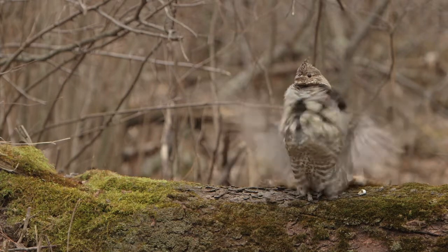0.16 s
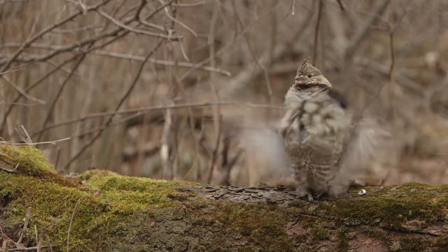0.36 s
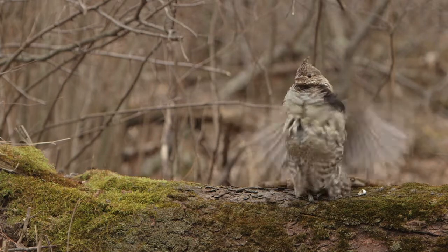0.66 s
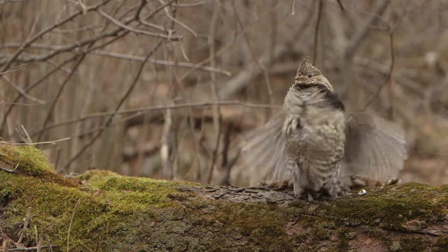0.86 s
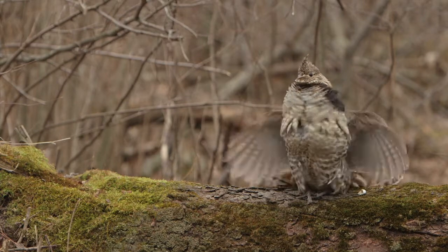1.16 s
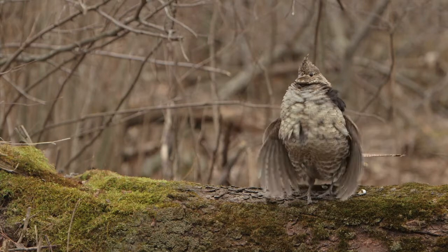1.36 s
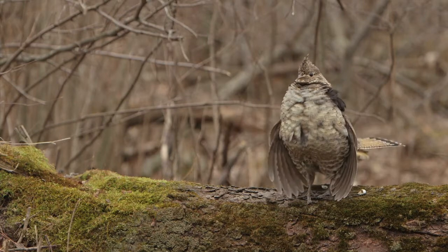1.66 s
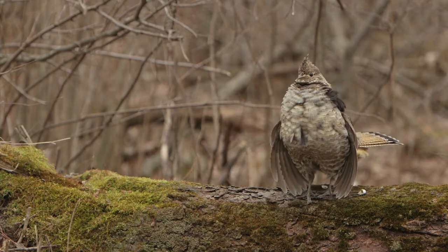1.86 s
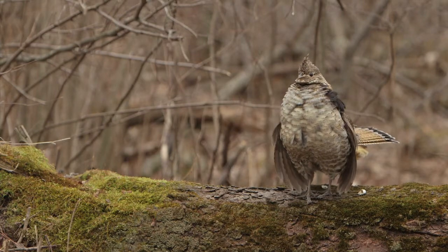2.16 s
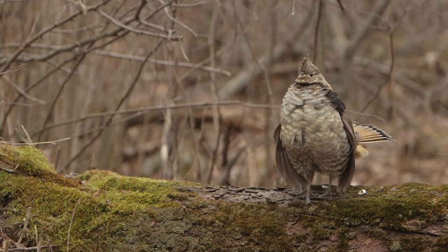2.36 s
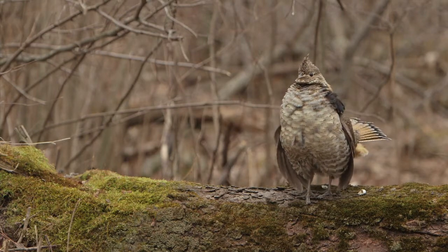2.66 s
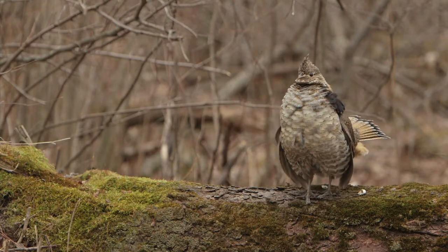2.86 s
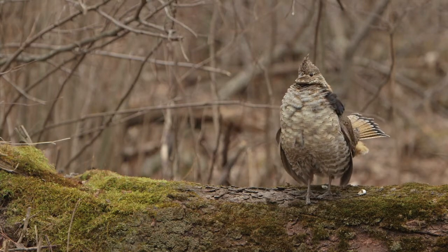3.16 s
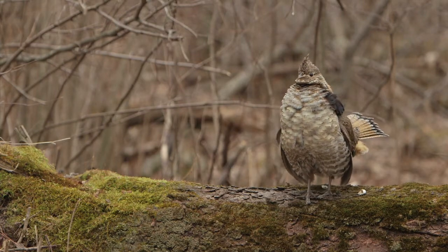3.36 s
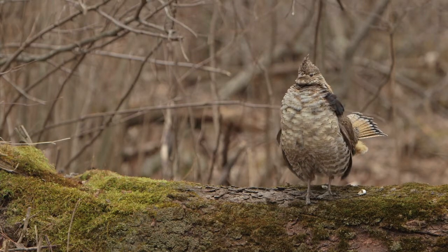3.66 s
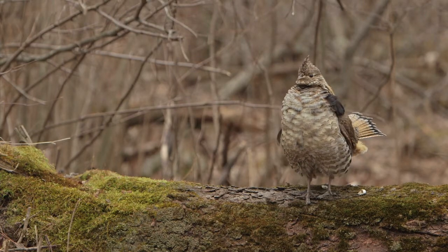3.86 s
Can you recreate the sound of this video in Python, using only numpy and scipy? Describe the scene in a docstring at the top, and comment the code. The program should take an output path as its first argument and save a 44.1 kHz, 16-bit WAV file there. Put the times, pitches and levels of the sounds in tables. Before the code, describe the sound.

A grouse drums with its wings, close and very deep: about fifteen blunt, slightly clipped thumps with airy swishes, from roughly sixteen a second slowing to eight, ending near 1.2 s. Faint songbirds whistle among them. Low rumble and hiss remain, fading by 3 s; small buzzes come around 1.9-2.4 s, a rapid twitter at 2.5-2.9 s, then sparse chips and whistles over soft woodland hush until 4 s.

```python
"""In a woodland, a grouse drums on a log in front of a stereo microphone: its strokes slow and stop.
Each stroke is a deep pressure pulse with a swish of shaped noise; the loudest thumps clip at full scale.
Small songbirds whistle, buzz and chip as gliding tones, with scattered tree echoes around them.
Behind lie a low rumble that cuts off, a hiss, a soft hush and a far chorus, all coloured noise.
"""
import sys
import numpy as np
from scipy import signal
from scipy.fft import rfft, irfft
from scipy.io import wavfile
from scipy.ndimage import uniform_filter1d

SR = 44100
rng = np.random.default_rng(int(sys.argv[2]) if len(sys.argv) > 2 else 0)


def output_pcm(signal):
    """Save a mono or channel-first signal as 16-bit PCM at the path in sys.argv[1].

    Samples are clipped to [-1, 1] before scaling.
    """
    pcm = np.clip(np.atleast_2d(signal).T, -1, 1) * 32767
    wavfile.write(sys.argv[1], SR, np.round(pcm).astype(np.int16))


N = 176400  # samples, 4 s


def amp(db):
    """Decibels to gain."""
    return 10 ** (np.asarray(db) / 20)


def unit(x):
    """Scales to rms 1."""
    return x / np.sqrt(np.mean(x ** 2) + 1e-20)


def read(points, hz):
    """Reads a spectrum table on a log-frequency axis."""
    f, value = np.transpose(points)
    return np.interp(np.log(hz + 1), np.log(f), value)


def add(mix, start_s, sound):
    """Mixes a sound in at a time, trimmed to the ends of the scene."""
    at = round(start_s * SR)
    sound = sound[max(-at, 0):]
    part = mix[max(at, 0):][:len(sound)]
    part += sound[:len(part)]


def progress(length_s):
    """Runs from 0 to 1 over a call."""
    return np.linspace(0, 1, int(length_s * SR), endpoint=False)


def wander(like, size):
    """Smooth random drift, as long as a call; size is the smoothing in samples."""
    return unit(uniform_filter1d(rng.standard_normal(SR), size=size))[:len(like)]


def band(x, centre_hz, octaves):
    """A broad resonance, bell-shaped on an octave axis, at rms 1."""
    hz = np.fft.rfftfreq(len(x), 1 / SR)
    distance = np.log2((hz + 1) / centre_hz) / octaves
    return unit(irfft(rfft(x) * np.exp(-.5 * distance ** 2), len(x)))


def trees(x, t60_s, spread):
    """Scattered echoes from trunks, dying by 60 dB in t60_s and partly different on each side."""
    t = np.arange(SR) / SR
    sparse = rng.standard_normal((3, SR)) * (rng.random((3, SR)) < .05)
    taps = sparse * amp(-60 * t / t60_s) * np.minimum(t / 0.012, 1)
    tail = taps[0] + spread * taps[1:]
    return signal.fftconvolve(x[None], tail / np.linalg.norm(tail[0]), axes=1)[:, :N]


# How alike left and right are at the microphone: (frequency [Hz], likeness [0-1])
SIDE_LIKENESS = [(100, 1), (1200, 0.96), (2500, 0.98), (5000, 0.67), (15000, .75)]


def noise(spectrum, patchy_db):
    """Stereo noise of a given colour at rms 1, with patches drifting in time and frequency."""
    frames, hz = N // 512 + 5, np.fft.rfftfreq(2048, 1 / SR)
    a, b, c, d, patches = rng.standard_normal((frames, len(hz), 5)).T
    patches = unit(uniform_filter1d(uniform_filter1d(patches, 20, 0), 5, 1))
    same = np.clip(read(SIDE_LIKENESS, hz), 0, 1)[:, None]
    left = a + 1j * b
    right = same * left + np.sqrt(1 - same ** 2) * (c + 1j * d)
    colour = amp(read(spectrum, hz)[:, None] + patchy_db * patches)
    return unit(signal.istft(np.array([left, right]) * colour, nperseg=2048, noverlap=1536)[1][:, :N])


# Background colours: (frequency [Hz], relative density [dB per Hz]); the chorus is many far birds blurred
RUMBLE_COLOUR = [(20, -26), (45, -12.5), (70, 1.5), (100, -1.5), (135, -4.5), (180, -38), (300, -50.5)]
HISS_COLOUR = [(100, -7), (200, 2), (420, 2.5), (800, -1.5), (1350, -2), (1700, -7), (3500, -10),
               (6000, -16), (9000, -19.5), (15500, -24.5)]
HUSH_COLOUR = [(75, -62), (110, -25), (170, -9), (245, 2.5), (330, -6), (550, -9), (1200, -23), (1900, -37),
               (4000, -58), (7500, -29), (15500, -48.5)]
CHORUS_COLOUR = [(1500, -25), (2600, -19.5), (3500, 2), (5000, 5.5), (7500, -6.5), (10000, -38)]
# Background levels through the scene: (time [s], level [dB])
RUMBLE_COURSE = [(0, -32.5), (1.15, -38.5), (1.33, -32), (1.5, -38.5), (2.2, -39.5), (3.05, -46.5),
                 (3.075, -85)]
HISS_COURSE = [(0, -42), (.45, -42), (1.8, -44), (2.4, -45.5), (2.8, -49.5), (3.1, -52.5)]
HUSH_COURSE = [(0, -47.5), (1.6, -66.5), (2.3, -52.5), (2.9, -42.5), (3.3, -42.5), (4, -42.5)]
CHORUS_COURSE = [(0, -51.5), (1.6, -71), (2.3, -57.5), (2.5, -47.5), (2.8, -48), (3, -54.5), (4, -47.5)]


def woodland():
    """Low rumble and hiss give way to a softer hush and a far chorus, each noise following its level."""
    def level(points):
        return amp(np.interp(np.arange(N) / SR, *np.transpose(points)))
    rumble = level(RUMBLE_COURSE) * noise(RUMBLE_COLOUR, patchy_db=-1.0)
    hiss = level(HISS_COURSE) * noise(HISS_COLOUR, patchy_db=1.34)
    hush = level(HUSH_COURSE) * noise(HUSH_COLOUR, patchy_db=1.0)
    chorus = level(CHORUS_COURSE) * noise(CHORUS_COLOUR, patchy_db=7.5)
    return rumble + hiss + hush + chorus


OVERTONE_DB, WAVER = -27.5, 0.007  # second harmonic; rms share of the pitch
NEAR_DB, FLUTTER_PER_DB = -30.5, .13  # calls below this level flutter, the more the fainter


def syrinx(hz, db, rasp=0):
    """A nearly pure tone on a pitch curve: waver unsteadies it, rasp jitters it, faint calls flutter."""
    unsteady_hz = hz * (1 + WAVER * wander(hz, size=90) + rasp * wander(hz, size=14))
    phase = 2 * np.pi * np.cumsum(unsteady_hz) / SR
    flutter_db = FLUTTER_PER_DB * max(NEAR_DB - db, 0) * wander(hz, size=600)
    return amp(db + flutter_db) * (np.sin(phase) + amp(OVERTONE_DB) * np.sin(2 * phase))


# Thin far whistles: (start [s], length [s], pitch [Hz], level [dB])
FAR_WHISTLES = [(1.139, 0.58, 3008, -54), (1.782, 0.56, 3896, -49.5), (2.7, 0.09, 3950, -40.5),
                (3.056, 0.049, 5240, -42.5), (3.441, 0.072, 5350, -40.5), (3.554, 0.22, 7080, -44.5),
                (3.82, .15, 3530, -55)]


def far_whistles():
    """Level notes of one pitch that swell and fade."""
    out = np.zeros(N)
    for start_s, length_s, hz, db in FAR_WHISTLES:
        u = progress(length_s)
        add(out, start_s, np.sin(np.pi * u) * syrinx(np.full(len(u), hz), db))
    return out


# Buzzes: (start [s], length [s], start pitch [Hz], end pitch [Hz], sweep depth [share of pitch],
# level [dB] before unevenness)
BUZZ_CALLS = [(0.938, 0.16, 4510, 3036, 0.46, -41.5), (1.879, 0.11, 4070, 3880, 0.61, -42.5),
              (2.128, 0.063, 3880, 4110, 0.69, -37), (2.327, 0.09, 3850, 3760, 0.71, -38),
              (2.046, 0.056, 6400, 6640, 0.186, -45), (2.229, 0.051, 6420, 6550, 0.2, -44.5)]
BUZZ_PER_S, BUZZ_RASP, BUZZ_UNEVEN = 88, 0.043, .21  # middle sweep rate; pitch jitter; rms drift


def buzzes():
    """Fast trains of upward sweeps, uneven in pace, pitch and force."""
    out = np.zeros(N)
    for start_s, length_s, first, last, depth, db in BUZZ_CALLS:
        u = progress(length_s)
        pace, lift, push = (BUZZ_UNEVEN * wander(u, size=400) for _ in range(3))
        sweep = np.cumsum(BUZZ_PER_S * np.exp(pace)) / SR % 1
        hz = (first + (last - first) * u) * (1 + depth * (sweep - .5 + .5 * lift))
        swell = np.exp(2 * push) * np.sqrt(np.sin(np.pi * u ** .5) * np.sin(np.pi * sweep))
        add(out, start_s, swell * syrinx(hz, db, BUZZ_RASP))
    return out


# Chips: (start [s], start pitch [Hz], pitch approached [Hz], level [dB] before the swell)
CHIP_CALLS = [(3.477, 7070, 1990, -33), (3.88, 5540, 3810, -39.5), (3.985, 6180, 1835, -37.5)]
CHIP_S, CHIP_FALL_S, CHIP_RASP = 0.029, 0.0048, 0.19  # length; time constant of the fall; pitch jitter


def chips():
    """Short raspy calls whose pitch drops fast at first, then settles."""
    out = np.zeros(N)
    for start_s, first, last, db in CHIP_CALLS:
        u = progress(CHIP_S)
        hz = last + (first - last) * np.exp(-u * CHIP_S / CHIP_FALL_S)
        add(out, start_s, np.sin(np.pi * u ** .5) * (1 - u) * syrinx(hz, db, CHIP_RASP))
    return out


# Whistled notes: (start [s], length [s], start pitch [Hz], middle pitch [Hz], end pitch [Hz],
# level [dB] relative to NOTE_DB)
WHISTLED_NOTES = [(0, 0.028, 3640, 3820, 3920, -37), (0.038, 0.03, 3580, 3395, 2580, -27),
                  (0.062, 0.023, 3050, 4030, 3850, -31.5), (0.077, 0.025, 3934, 3860, 3850, -28.5),
                  (0.143, 0.028, 4050, 3610, 2600, -28), (0.165, 0.037, 4700, 4180, 4050, -31.5),
                  (0.435, 0.017, 3160, 4150, 5100, -39), (0.521, 0.073, 3730, 3825, 3530, -33),
                  (0.57, 0.032, 3760, 3450, 2480, -29.5), (0.59, 0.037, 2805, 2484, 2320, -42.5),
                  (0.76, 0.054, 3760, 4570, 4900, -38.5), (0.803, 0.06, 3544, 3500, 3820, -33),
                  (1.771, 0.08, 3850, 3490, 2870, -45), (1.76, 0.066, 2910, 2560, 2440, -47),
                  (2.371, 0.14, 2600, 2850, 3030, -45.5), (2.484, 0.021, 5840, 5240, 4070, -35.5),
                  (2.5, 0.019, 5270, 4880, 3960, -33.5), (2.525, 0.037, 2770, 3264, 3360, -30),
                  (2.576, 0.021, 5490, 5020, 3780, -30.5), (2.596, 0.017, 5470, 4940, 4130, -33),
                  (2.623, 0.028, 2746, 3200, 3600, -32.5), (2.674, 0.015, 5380, 4860, 4000, -27.5),
                  (2.689, 0.017, 5350, 5110, 4480, -30), (2.716, 0.0286, 2890, 3240, 3570, -29),
                  (2.774, 0.0094, 5240, 5000, 4200, -30.5), (2.787, 0.015, 5500, 4800, 4200, -28.5),
                  (2.805, 0.037, 2880, 3020, 3340, -34), (2.824, .07, 6070, 6120, 5930, -46.5),
                  (2.87, 0.069, 5970, 6600, 6950, -48), (2.898, 0.057, 5190, 4980, 4900, -41),
                  (3.36, .018, 2700, 4180, 5500, -45), (3.379, 0.03, 6000, 6420, 7060, -45.5),
                  (3.464, 0.016, 3400, 4690, 5800, -41), (3.407, .032, 5200, 4520, 4300, -46),
                  (3.511, 0.03, 4400, 4120, 3000, -45), (3.747, 0.034, 7100, 6000, 5100, -44.5),
                  (3.828, 0.045, 7600, 5900, 5000, -41.5)]
NOTE_DB, NOTE_SHAPE = -1, 0.87  # shape: exponent on the swell


def whistled_notes():
    """Short whistles on a curved glide through three pitches."""
    out = np.zeros(N)
    for start_s, length_s, first, middle, last, db in WHISTLED_NOTES:
        u = progress(length_s)
        bend = 2 * (2 * middle - first - last) * u * (1 - u)
        hz = first + (last - first) * u + bend
        add(out, start_s, np.sin(np.pi * u) ** NOTE_SHAPE * syrinx(hz, NOTE_DB + db))
    return out


BIRD_WET_DB, BIRD_T60_S, BIRD_SPREAD = -6.5, 0.88, 3.6
BIRD_LAG_S = .00003  # the right side hears the birds later
BUZZ_WET_DB = -8  # extra echo: the buzzing birds are farther off


def songbirds():
    """All the small birds, heard from one side by a tiny delay, with echoes from the trees."""
    buzz = buzzes()
    direct = far_whistles() + buzz + chips() + whistled_notes()
    delay = np.exp(-2j * np.pi * np.fft.rfftfreq(N, 1 / SR) * BIRD_LAG_S)
    later = irfft(rfft(direct) * delay, N)
    echoes = amp(BIRD_WET_DB) * trees(direct, BIRD_T60_S, BIRD_SPREAD)
    far_echoes = amp(BUZZ_WET_DB) * trees(buzz, t60_s=0.18, spread=.6)
    return np.array([direct, later]) + echoes + far_echoes


# Feather and twig snaps: (time [s], level before decay [dB], centre [Hz], decay time constant [s])
SNAP_EVENTS = [(.073, -30, 2500, 0.0014), (0.1303, -23, 2200, 0.0019), (0.182, -31.5, 1980, 0.003),
               (0.2366, -21, 2340, 0.0014), (1.918, -43, 6460, 0.0022), (1.986, -42, 6500, 0.0018),
               (3.1, -40.5, 1510, 0.0018), (3.275, -43.5, 1570, .002)]


def snaps():
    """Tiny dry cracks, each a noise burst in a broad resonance, with a little echo."""
    out, t = np.zeros(N), np.arange(2048) / SR
    for start_s, db, centre_hz, decay_s in SNAP_EVENTS:
        burst = band(rng.standard_normal(len(t)), centre_hz, octaves=0.56)
        add(out, start_s, amp(db) * burst * np.exp(-t / decay_s))
    return out + amp(-13) * trees(out, t60_s=0.6, spread=0.16)


RUSTLE_AT_S, RUSTLE_WIDTH_S = 0.19, 0.064  # centre and spread of the bell-shaped swell
RUSTLE_DB, RUSTLE_PER_S, RUSTLE_HZ = -40, 5000, 1170  # level before the swell; grain rate; centre
CHURN_DB, CHURN_HZ = -28.5, 165  # air left swirling between the fastest strokes


def rustle():
    """Dense, soft grains of brushing feathers and low churned air swell once in the fastest strokes."""
    grains = rng.standard_normal(N) * (rng.random(N) < RUSTLE_PER_S / SR)
    feathers = amp(RUSTLE_DB) * band(grains, RUSTLE_HZ, octaves=1)
    churn = amp(CHURN_DB) * band(rng.standard_normal(N), CHURN_HZ, octaves=0.57)
    swell = np.exp(-.5 * ((np.arange(N) / SR - RUSTLE_AT_S) / RUSTLE_WIDTH_S) ** 2)
    return (feathers + churn) * swell


# Wing strokes: (time of pressure peak [s], thump strength [dB], swish level [dB] relative to SWISH_DB)
STROKES = [(.0382, 2.5, 8), (0.1009, 3.3, 4), (0.1571, 4.5, 7.5), (0.2075, 3, 4.5), (0.2637, 0.2, 5),
           (0.3247, 0.1, 7), (0.392, 0, 5), (0.4646, 0.5, 5.5), (0.544, 1.54, 5), (0.6288, -0.7, 6.5),
           (.722, 0.7, 5), (0.8204, -1, 8), (0.9275, 0.2, 4.5), (1.0405, -0.6, 6), (1.1623, -1, 5)]
# Colour of the feather swish: (frequency [Hz], relative density [dB per Hz])
SWISH_COLOUR = [(120, -43.5), (220, -34.5), (330, -55.5), (550, -55.5), (1500, -65.5), (3500, -59.5),
                (6000, -72.5), (15000, -84)]
THUMP_HZ, THUMP_SAG_PER_S = 73.2, 28  # pitch at the peak; rate at which it falls
SWELL_S, EBB_S = 0.0057, 0.009  # bell widths before and after the peak
THUMP_DB = -0.6  # strength of a stroke with a plain, unsharpened pulse
SWISH_DB, SWISH_LEAD_S, SWISH_RISE_S, SWISH_FADE_S = -33, 0.012, 0.0042, 0.025
ECHO_DB, ECHO_T60_S = -20, 0.31  # the thumps come back from the wood


def wings():
    """Each stroke is suction, a pressure peak and suction again; feathers hiss from just before the peak."""
    thumps, rush = np.zeros(N), np.zeros(N)
    half_s = .05
    t = np.arange(-half_s, half_s, 1 / SR)
    turns = THUMP_HZ * (1 - np.exp(-THUMP_SAG_PER_S * t)) / THUMP_SAG_PER_S
    bell = np.exp(-.5 * (t / np.where(t < 0, SWELL_S, EBB_S)) ** 2)
    pulse = np.cos(2 * np.pi * turns) * bell
    # a harder stroke sharpens the peak and draws as much air back
    crest = np.maximum(pulse, 0) ** 2
    refill = np.exp(-.5 * (t / SWELL_S) ** 2)
    crest = crest - refill * crest.sum() / refill.sum()
    u = np.arange(SR // 8) / SR
    puff = np.minimum(u / SWISH_RISE_S, 1) * np.exp(-u / SWISH_FADE_S)
    for peak_s, db, swish_db in STROKES:
        add(thumps, peak_s - half_s, amp(THUMP_DB) * pulse + (amp(db) - amp(THUMP_DB)) * crest)
        add(rush, peak_s - SWISH_LEAD_S, amp(SWISH_DB + swish_db) * puff)
    echoes = amp(ECHO_DB) * trees(thumps, ECHO_T60_S, spread=0.12)
    return thumps + echoes + rush * noise(SWISH_COLOUR, patchy_db=1.5)


def scene():
    """The wood around, the grouse in front."""
    return woodland() + songbirds() + snaps() + rustle() + wings()


def record(dry):
    """The thump peaks clip at full scale; then a steep low-pass limits the band."""
    clipped = np.clip(dry, -1, 1)
    lowpass = signal.firwin(511, 15850, window=("kaiser", 9), fs=SR)  # cutoff in Hz
    return signal.oaconvolve(clipped, lowpass[None], "same")


dry = scene()
out = record(dry)
output_pcm(out)
```